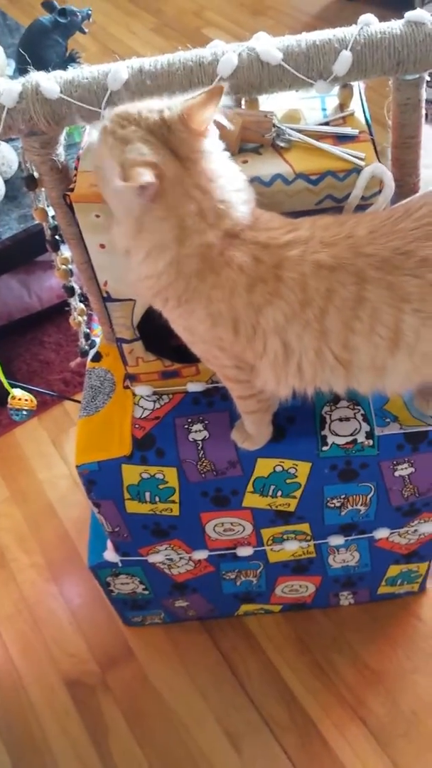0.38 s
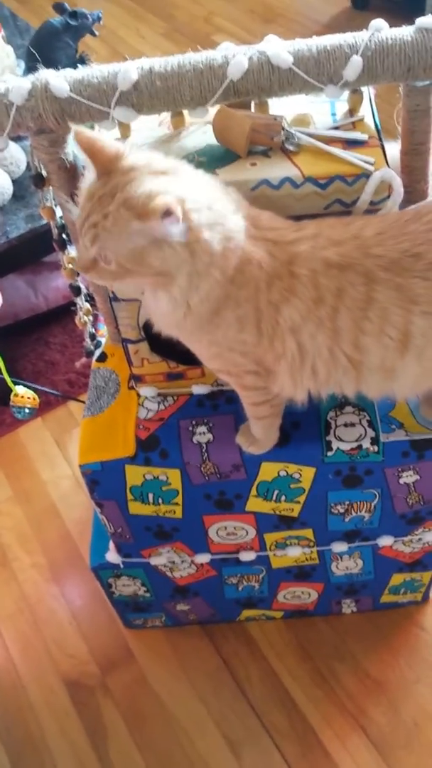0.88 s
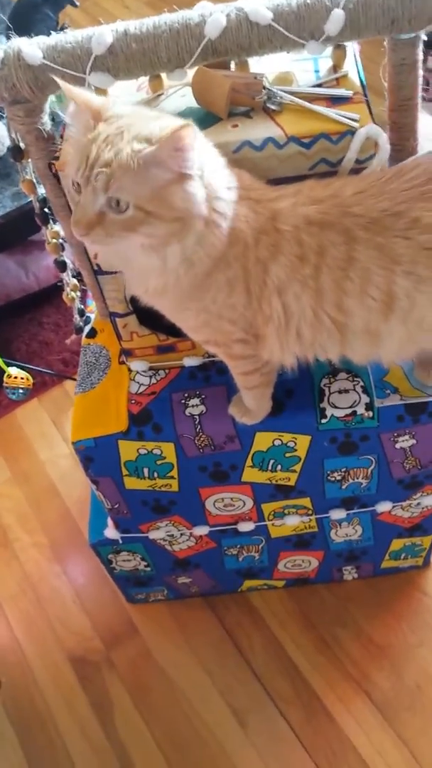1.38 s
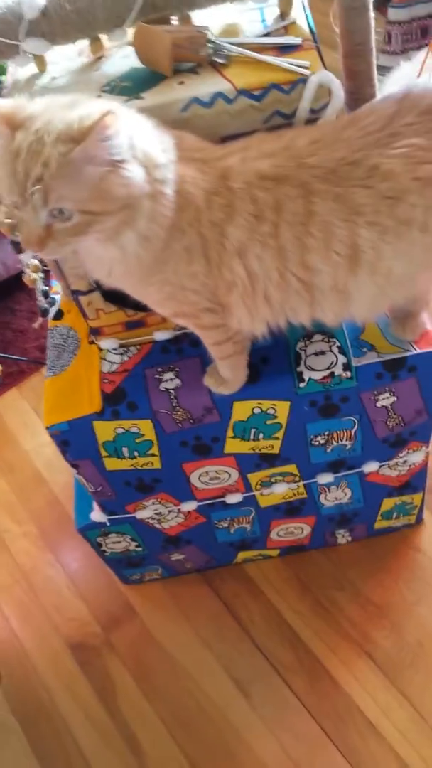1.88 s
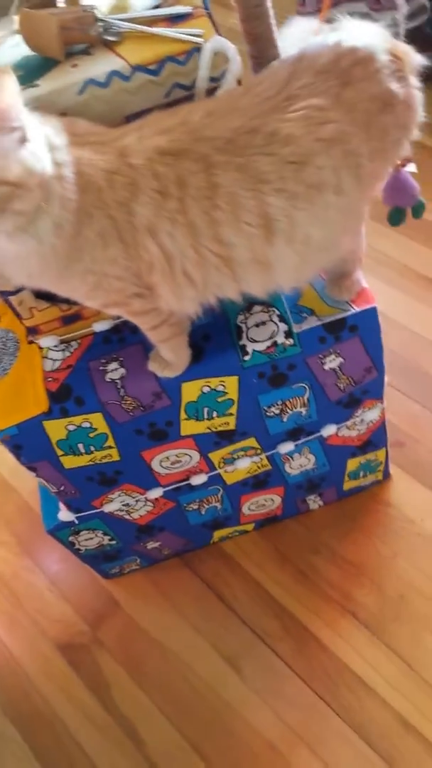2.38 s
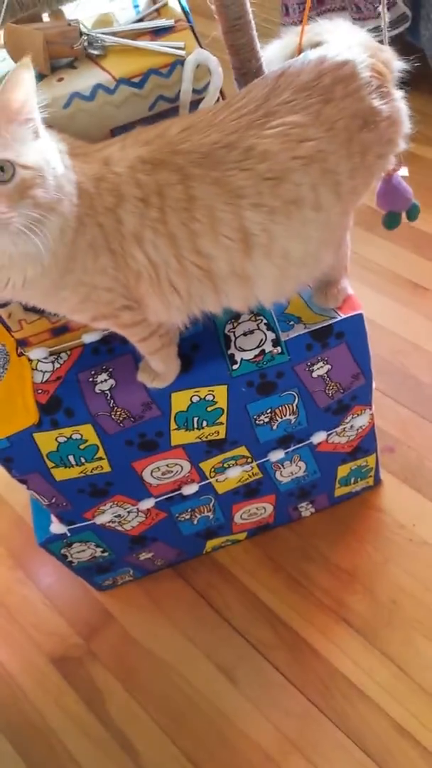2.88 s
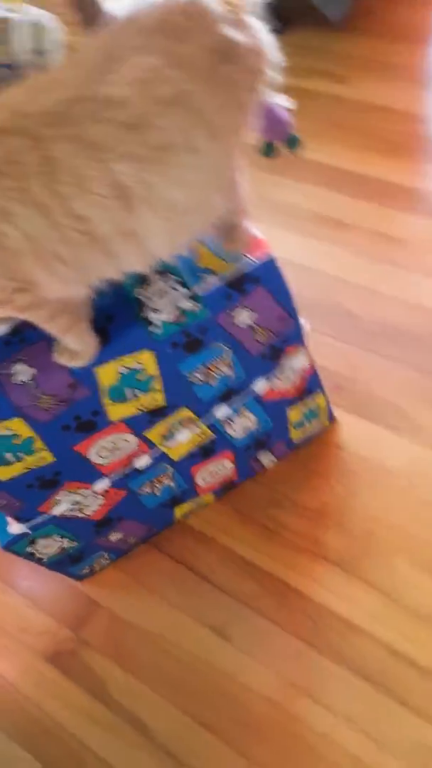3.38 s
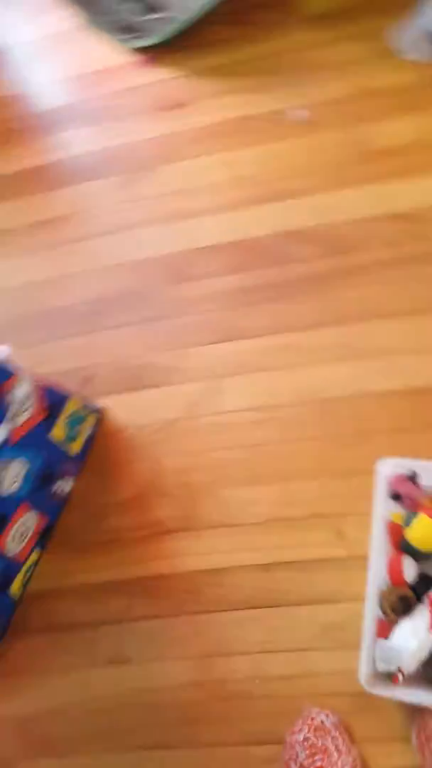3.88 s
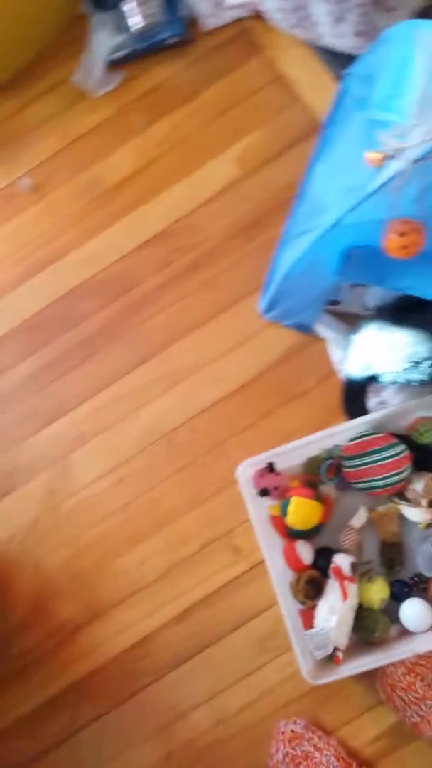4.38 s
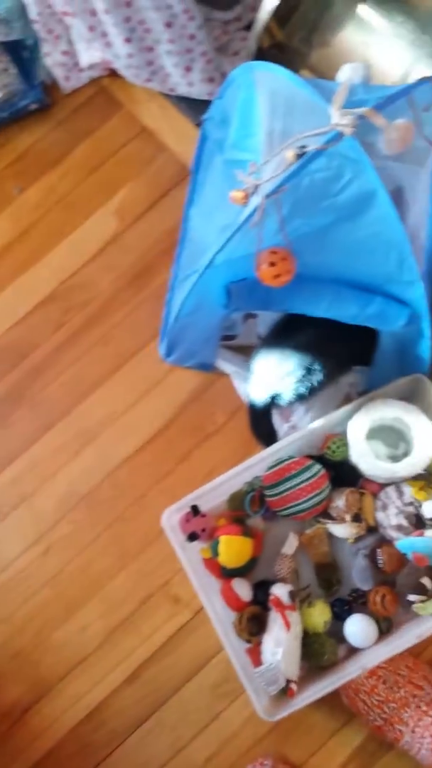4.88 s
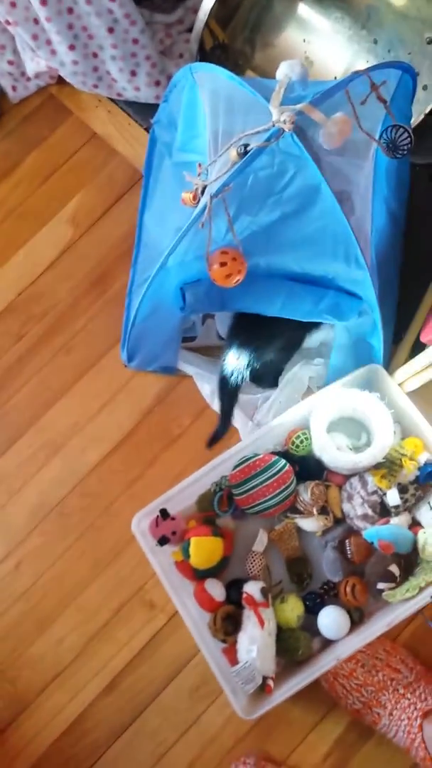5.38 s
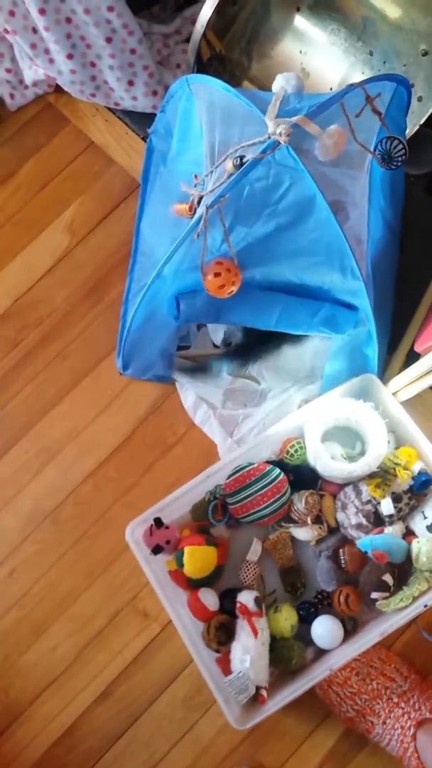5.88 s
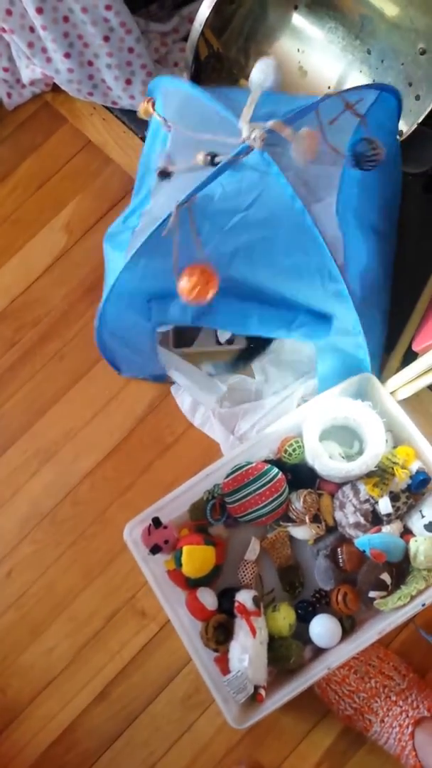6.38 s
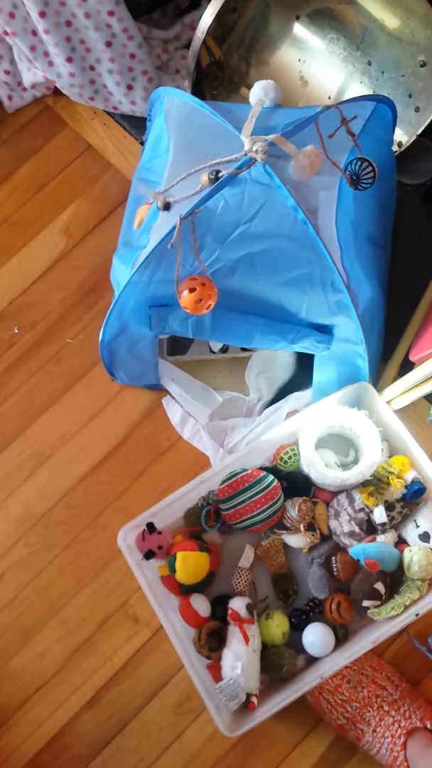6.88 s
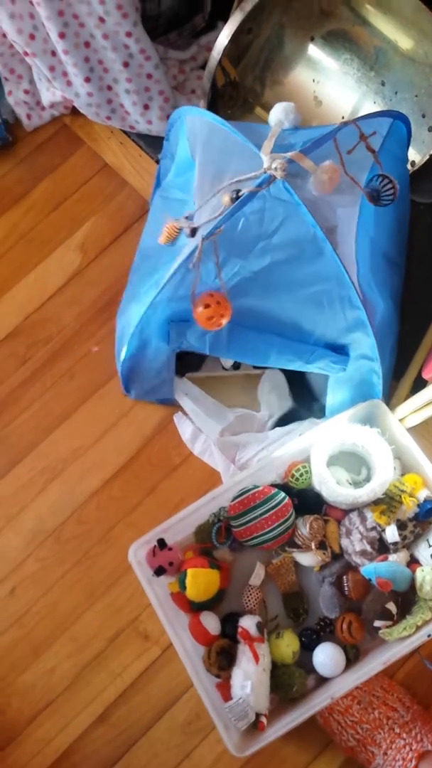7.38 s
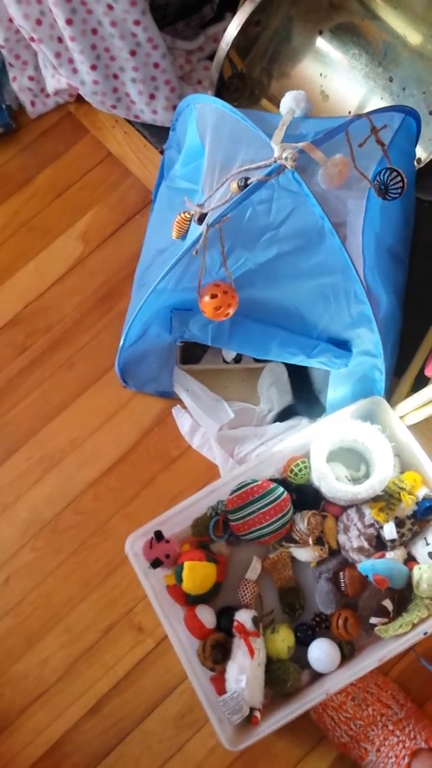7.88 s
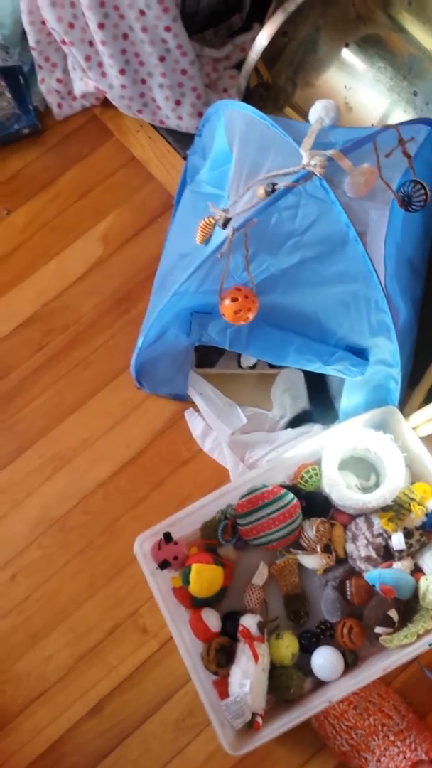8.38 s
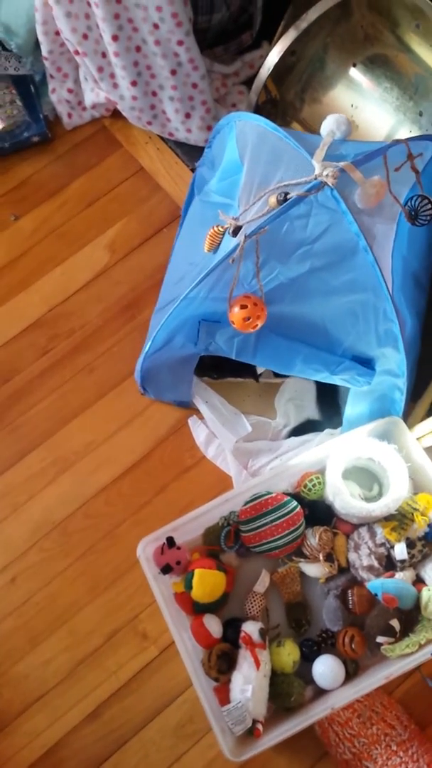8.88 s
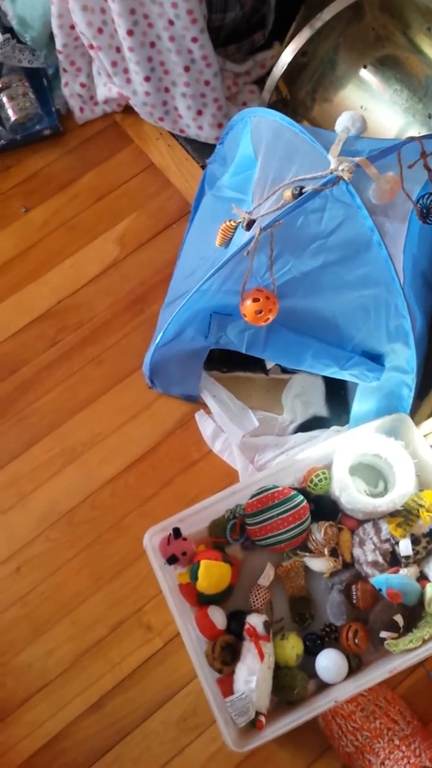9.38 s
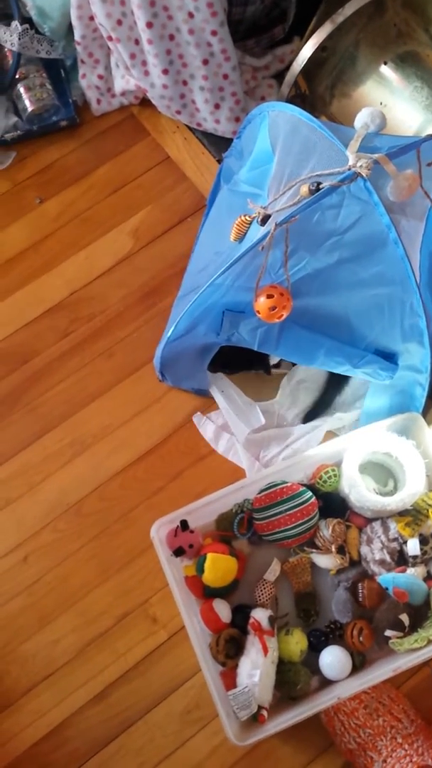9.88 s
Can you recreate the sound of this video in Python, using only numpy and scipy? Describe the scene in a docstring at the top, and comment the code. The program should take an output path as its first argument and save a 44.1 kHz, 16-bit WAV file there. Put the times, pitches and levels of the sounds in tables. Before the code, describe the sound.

A brief jingle of tiny bells opens close by, then a cat on a cloth cube makes crackly rustles and dry creasing ticks. Movement thins out, then a second cat in a nylon tent crinkles the fabric and tissue, snapping it sharply while bells rattle brightly. Another hard crack follows, then near quiet and light ticking. Hand-held phone in a small wooden-floored room with a faint distant appliance drone.

```python
"""Cloth, then nylon and tissue, rustle and snap as two cats move among their toys on a wooden floor.
Rustle is crackling noise, snaps are decaying noise ticks, and paws knock through a low resonance.
A string of tiny bells jingles as decaying modes; an appliance drones far off in narrow noise bands.
A hand-held phone turns from a cloth cube to a nylon tent; its microphone ports ring at 6.3-7.2 kHz."""
import sys
import numpy as np
from scipy import signal
from scipy.fft import rfft, irfft, next_fast_len
from scipy.io import wavfile
from scipy.ndimage import map_coordinates

SR = 44100
rng = np.random.default_rng(int(sys.argv[2]) if len(sys.argv) > 2 else 0)


def transcribe(u):
    """Save the signal u as a 16-bit wav file named by the first command-line argument.

    u: samples, shape (n,) or (channels, n), limited to [-1, 1]; the rate is SR.
    q: integer samples, one column per channel.
    """
    v = np.clip(np.atleast_2d(u).T, -1, 1)
    q = np.round(v * 32767).astype(np.int16)
    wavfile.write(sys.argv[1], SR, q)


def voltage_ratio(level):
    """Linear amplitude factor for a level in decibels (scalar or array-like)."""
    return 10 ** (np.asarray(level, float) / 20)


N = 441000


def unit(x):
    """Scaled to rms 1."""
    return x / np.sqrt(np.mean(x ** 2) + 1e-20)


def along(points, hz):
    """(Hz, value) points interpolated on a log frequency axis."""
    point_hz, value = np.transpose(points)
    return np.interp(np.log(hz + 1), np.log(point_hz + 1), value)


def curves(rows):
    """One value per sample for each column after the time."""
    time_s, *columns = np.transpose(rows)
    return [np.interp(np.arange(N) / SR, time_s, column) for column in columns]


def wobble(knots_per_s):
    """A smooth random curve through normally distributed knots."""
    knots = rng.standard_normal(int(N * knots_per_s / SR) + 4)
    return map_coordinates(knots, [np.arange(N) * knots_per_s / SR])


def filtered(x, response):
    """x times a complex response of frequency."""
    size = next_fast_len(N + 8192)
    spectrum = rfft(x, size) * response(np.fft.rfftfreq(size, 1 / SR))
    return irfft(spectrum, size)[..., :N]


def coloured(x, spectrum):
    """x through a spectrum, at rms 1."""
    return unit(filtered(x, lambda hz: voltage_ratio(along(spectrum, hz))))


def peak(f, hz, width_hz):
    """A causal resonance of gain 1 at its top."""
    return 1j * f * width_hz / (hz * hz - f * f + 1j * f * width_hz + 1e-9)


def crackle(per_s, spread_db, smooth):
    """Sub-millisecond bursts of unequal but bounded size, as fibres slip, over a share of friction noise."""
    sizes = voltage_ratio(spread_db * np.clip(rng.standard_normal(N), -2, 2))
    slips = (rng.random(N) < per_s / SR) * sizes
    decay_s = 0.00041
    bursts = signal.lfilter([1], [1, -np.exp(-1 / (decay_s * SR))], slips) * rng.standard_normal(N)
    smooth = np.clip(smooth, 0, 1)
    return np.sqrt(1 - smooth) * unit(bursts) + np.sqrt(smooth) * rng.standard_normal(N)


def facing_tent():
    """0 while the phone faces the cube, 1 once it faces the tent; a linear turn of 1 s."""
    turn_mid_s, turn_s = 3.62, 1.0
    return np.clip((np.arange(N) / SR - turn_mid_s) / turn_s + .5, 0, 1)


def pair(response):
    """Stereo noise whose left-right likeness and balance depend on frequency, at rms 1."""
    # hz, left-right likeness (clipped to -1..1)
    likeness = [(60, 0.37), (180, 0.96), (550, 0.9), (1650, -0.86), (4970, 1), (15000, -1.1)]
    # hz, left_over_right_db
    balance = [(60, 1.5), (180, -1.5), (550, 7), (1650, 8), (4970, -10), (15000, -5.5)]

    def mid_side(hz):
        angle = np.arccos(np.clip(along(likeness, hz), -1, 1)) / 2
        return response(hz) * [np.cos(angle), np.sin(angle)]

    mid, side = filtered(rng.standard_normal((2, N)), mid_side)
    lean = lambda hz: voltage_ratio(along(balance, hz) * np.array([[.5], [-.5]]))
    return unit(filtered(np.array([mid + side, mid - side]), lean))


def room_tone():
    """Air and microphone hiss, a motor's hum of tones, and a drone that changes as the phone moves."""
    # air spectrum: hz, relative level_db_per_hz
    air_spectrum = [(20, -31), (60, -17), (130, -10.5), (300, -12.5), (450, -21.5), (900, -20.5),
                    (1500, -30), (4000, -36), (6900, -27), (9500, -33), (16000, -42)]
    # drone bands: hz, width_hz of one resonance (applied twice), relative level_db
    drone_bands = [(189.2, 4.2, -68), (233, 108, -65.5), (297.2, 4.3, -68.5), (383.5, 6.8, -75),
                   (552, 4.8, -77), (896, 24, -76.5)]
    # drone level before trim: time_s, level_db
    drone_level = [(0.0, -60), (1.36, -58), (2.9, -64), (3.45, -59.5), (4.6, -63.5), (6.24, -60.5),
                   (6.35, -58.5), (7.49, -55.5), (8.08, -65), (9.44, -65.5), (10.0, -58)]
    # hum tones: hz, level_db before trim
    hum_tones = [(168, -60.5), (321, -72.5), (802, -73)]
    air = voltage_ratio(-60.0) * pair(lambda hz: voltage_ratio(along(air_spectrum, hz)))
    drone = pair(lambda f: sum(voltage_ratio(db) * peak(f, hz, width_hz) ** 2 / np.sqrt(width_hz)
                               for hz, width_hz, db in drone_bands))
    t = np.arange(N) / SR
    hum = np.zeros(N)
    for hz, db in hum_tones:
        tone_gain = voltage_ratio(db + 2.5 + 1.9 * wobble(2.994))
        hum += tone_gain * np.sin(2 * np.pi * hz * t + 0.5 * wobble(4))
    level_db = curves(drone_level)[0]
    hum_gain = voltage_ratio(0.8 * (level_db - level_db.mean()))
    return air + hum_gain * hum + voltage_ratio(level_db + 1.0) * drone


def strikes():
    """Rows (s, dB of each bell): clear strikes that jog the other bells on the string, then loose rattle."""
    # one list for each bell: start_s, level_db before trim
    clear_strikes = [
        [(0.004, -41), (0.055, -34.5), (0.1344, -25), (0.1484, -28), (0.1913, -32.5), (0.2144, -35.5),
         (0.224, -42), (0.2773, -28), (0.329, -33), (1.07, -33), (1.1976, -51)],
        [(0.0022, -33.5), (0.043, -35), (0.1344, -40), (0.2144, -42), (6.4583, -32), (6.4756, -25),
         (6.489, -22), (6.5117, -17), (6.5216, -22), (6.545, -22), (6.5633, -35), (6.5803, -27)],
        [(0.1344, -31.5), (0.1484, -43), (0.2144, -32.5), (0.2773, -32), (0.2937, -27.5)],
        [(0.015, -50), (0.043, -42), (0.055, -46), (0.064, -39), (0.12, -43), (0.135, -38), (0.176, -37),
         (0.2144, -34), (0.259, -23), (0.2773, -24), (0.3175, -26), (0.3426, -33), (0.3516, -28.5),
         (1.1127, -47), (1.1272, -37), (1.1405, -30), (1.1643, -31), (1.1976, -33), (1.2903, -41),
         (1.3037, -30), (1.3279, -41), (6.316, -40), (6.327, -36), (6.336, -37), (6.4213, -30), (6.4381, -26),
         (6.4467, -23), (6.489, -28), (6.524, -24), (6.5635, -33), (6.6059, -34), (6.6263, -32), (6.6574, -25),
         (6.707, -41.5), (6.7266, -31), (6.7356, -29), (6.7445, -32), (6.8074, -39)],
        [(0.055, -48), (0.1344, -32), (0.1484, -42), (0.1913, -35), (0.2144, -30), (0.224, -37),
         (0.2773, -15.5), (0.2937, -37), (0.329, -38), (1.07, -37), (6.6711, -25), (6.6884, -23), (6.707, -22),
         (6.834, -31), (6.8555, -30)],
        [(6.4213, -23), (6.4381, -29), (6.4583, -21), (6.4756, -29), (6.489, -21.5), (6.5117, -26),
         (6.5633, -37), (6.6278, -38), (6.668, -24), (6.676, -30), (6.6884, -23), (6.707, -21), (6.8079, -36),
         (6.834, -27), (6.8555, -21.5)],
        [(6.4213, -28), (6.4381, -30), (6.5117, -29), (6.6884, -19), (6.707, -19.5), (6.8555, -30)],
    ]
    # swings of the string: start_s, end_s, then level_db of each bell before trim
    swings = [(0, 0.402, -44, -54, -47, -42, -62, -72.5, -61),
              (1.11, 1.352, -49, -67, -65.5, -48, -54, -67, -65),
              (6.441, 6.598, -54, -32, -60, -38, -52, -43, -38),
              (6.599, 6.877, -53, -54, -64, -42, -39, -42, -40)]
    jog_db, jog_spread_db = -24, 2.5
    rattle_spread_db, contacts_per_swing = 4.5, 20
    count = len(clear_strikes)
    rows, others = [], 1 - np.eye(count)
    for struck, hits in enumerate(clear_strikes):
        for s, db in hits:
            jog = jog_db + jog_spread_db * rng.standard_normal(count)
            rows.append((s, *(db + others[struck] * jog)))
    for start_s, end_s, *levels in swings:
        for s in rng.uniform(start_s, end_s, contacts_per_swing):
            rows.append((s, *(levels + rattle_spread_db * rng.standard_normal(count))))
    return rows


def bells():
    """Each strike rings every mode at a new strength, unlike at each port; the loose pea then rebounds."""
    # modes of each bell: hz, relative level_db, t60_s
    bell_modes = [
        [(5310, -9, 0.11), (5760, -14, 0.13), (5830, -12, 0.08), (5830, -9.5, 0.19)],
        [(6902, 0, 0.1), (6580, -16, .06), (5260, -13, 0.087)],
        [(7000, -19, .1), (7200, -9.5, .12), (7630, -21, .12), (7700, -15, 0.31), (7800, -16, 0.18),
         (8000, -14, .04), (9150, -8, 0.063), (9440, -16, 0.06)],
        [(10760, -12.5, 0.13), (10920, -8, 0.053), (11020, -7, 0.025), (11370, -14, .015), (12200, -20, 0.02)],
        [(6100, -25, .03), (6266, -9, 0.08), (6350, -5.5, 0.081)],
        [(5200, -11, 0.046), (5740, -12, 0.073), (5820, -8, 0.071), (5930, -8, 0.054)],
        [(7100, -16, .06), (7267, -17, .05), (7564, -14, 0.069), (7650, -5.5, 0.053), (8320, -11, .04),
         (9460, -9, 0.043)],
    ]
    # extra strength of each bell's first cycles (ratio)
    clanks = [1.9, .1, 1.3, 1.1, 2.2, 1.44, 1.9]
    # rise time constant of each bell: onset_s
    onsets = [.0003, 0.0014, 0.00025, 0.00052, 0.00024, 0.00025, 0.00026]
    trims_db = [-10.5, -11.0, -8.5, -3.0, -13.5, -10.5, -10.5]
    tick_db, tick_t60_s = -20, 0.0027  # contact noise re the loudest bell of the strike
    out, t = np.zeros((2, N + SR)), np.arange(SR // 5) / SR
    for s, *levels in strikes():
        at = round(s * SR)
        tick_gain = voltage_ratio(max(levels) + tick_db - 60 * t[:300] / tick_t60_s)
        out[:, at:][:, :300] += tick_gain * rng.standard_normal(300)
        for modes, db, trim_db, clank, onset_s in zip(bell_modes, levels, trims_db, clanks, onsets):
            hz, mode_db, t60_s = np.transpose(modes)[:, :, None]
            both, left, right, detune = rng.standard_normal((4, len(modes), 1))
            luck_db = 1.4 * both + 0.68 * np.array([left, right])
            size = voltage_ratio(db + trim_db + mode_db + luck_db - 60 * t / t60_s)
            phase = 2 * np.pi * hz * (1 + 0.0014 * detune) * t + 0.71 * np.array([right, left])
            ring = np.sum(size * np.sin(phase), axis=1)
            ring *= 1 - np.exp(-t / max(onset_s, 1 / SR))
            ring *= 1 + clank * np.exp(-t / 0.0036)  # the first cycles die fast
            out[:, at:][:, :len(t)] += ring
            for wait, luck in rng.random((3, 2)):
                rebound = round((s + .003 + .045 * wait) * SR)
                out[:, rebound:][:, :len(t)] += voltage_ratio(-22.0 - 7.52 * wait - 7.4 * luck) * ring
    return out[:, :N]


def snaps():
    """Creases give a dry tick, hard ones add a white crack and a hiss; paws knock softly through the frame."""
    # creases and paws: start_s, level_db before trims, knock_db re the snap before trims
    events = [(0.4788, -36, -15.5), (0.665, -32, -32), (0.7485, -25, -28), (0.86, -24, -31),
              (1.0302, -28, -21), (1.2004, -24, -37), (1.3892, -21, -24), (1.5456, -34, -35.5),
              (1.905, -23.5, -31), (2.0332, -23.5, -20), (2.342, -27.5, -24), (2.3841, -28.5, -23),
              (2.8423, -37.5, -33), (3.2656, -36, -26), (3.3123, -32, -14), (3.41, -46, -37),
              (4.3262, -35.5, -26), (4.3866, -30.5, -23), (5.9332, -25, -15), (5.969, -21, -22),
              (6.0006, -41.5, -22.5), (6.23, -29.5, -8), (6.2449, -22, -17), (6.3028, -9.5, -23.5),
              (6.3049, -12, -30), (6.3061, -18, -30), (7.265, -22, -40.5), (7.3373, -10, -22),
              (7.339, -15, -35), (7.3454, -17, -25), (7.507, -23, -43), (7.7528, -31, -26),
              (7.8, -24.5, -33), (7.882, -23, -47), (8.2956, -36, -24.5), (8.678, -39, -10),
              (9.307, -41.5, -26), (9.325, -50, -25.5), (9.41, -43, -21), (9.506, -29.5, -42.5),
              (9.5487, -39, -28), (9.6135, -32, -26.5), (9.6274, -35, -22), (9.7014, -29, -27),
              (9.7256, -35.5, -27), (9.7593, -30, -28), (9.815, -31, -27), (9.84, -26, -24),
              (9.866, -32, -31), (9.899, -28, -30), (9.9235, -30, -34)]
    tick, crack, knock = np.zeros((3, N + SR))
    t = np.arange(SR // 10) / SR
    for s, db, knock_db in events:
        snap_noise, knock_noise = rng.standard_normal((2, len(t)))
        snap_noise = snap_noise / np.std(snap_noise[:30])  # the first 0.7 ms sets the level
        at, hard = round(s * SR), np.clip((db + 25) / 18, 0, 1)
        decay = voltage_ratio(-60 * t / 0.0069) + 0.17 * hard * voltage_ratio(-60 * t / 0.067)  # tick, then hiss
        tick[at:][:len(t)] += voltage_ratio(db - 1.5) * snap_noise * decay
        crack[at:][:len(t)] += voltage_ratio(db - 8) * hard * voltage_ratio(-60 * t / 0.00032)
        knock[at:][:len(t)] += voltage_ratio(db + knock_db + 11.0) * knock_noise * voltage_ratio(-60 * t / 0.036)
    dry_tick = filtered(tick[:N], lambda f: peak(f, 5430.0, 4550) ** 2)
    white_crack = filtered(crack[:N], lambda f: peak(f, 9500, 15000))
    soft_knock = filtered(knock[:N], lambda f: peak(f, 320, 850) + 1.0 * peak(f, 320.0, 160))
    return dry_tick + white_crack + soft_knock


def effort_db():
    """Drive of fabric and frame: every swish rises and falls steadily in dB over the faint stirring."""
    # faint rustle that never stops: time_s, level_db before trims
    stirring = [(0, -51), (0.45, -55), (1.25, -46), (1.65, -51), (2.2, -67), (2.45, -62), (2.9, -61),
                (3.55, -54), (4.1, -64), (4.55, -65.5), (5.4, -61), (5.7, -66), (6.2, -55), (6.6, -69),
                (7.05, -49), (7.57, -55.5), (8, -70), (8.25, -69), (8.88, -70), (9.48, -75.5), (9.6, -57.5),
                (10, -54)]
    # moves of a cat against the fabric: peak_s, peak_db before trims, rise_s per 20 dB, fall_s per 20 dB,
    # frame_db over the fabric; rise and fall shorter than sharpest_s are raised to it
    swishes = [(0.146, -47, -0.5, 1, -12), (0.521, -35.5, 0.07, 0.17, -13),
               (0.715, -26.5, 0.1, 0.12, -16.5), (0.818, -23.5, 0.0739, 0.0267, -11.5),
               (0.88, -34, 0.06, 0.08, -11), (1.048, -30.5, 0.1, 0.23, -12),
               (1.394, -34.5, -0.02, 0.5, -14), (1.476, -27, 0.07, -0.02, -28),
               (1.6, -47.5, -0.26, 0.21, -2.5), (1.737, -33.5, -0.06, 0.09, -9),
               (1.909, -34, 0.15, 0.36, -11), (2.086, -28, 0.14, 0.0647, -14),
               (2.39, -47.5, 0.2, -0.08, -11), (2.656, -36, 0.18, 0.0947, -11.5),
               (3.07, -48.5, 0.04, 0.08, -8.5), (3.172, -50, 0, 0.23, -5), (3.344, -42, 0.15, 0.35, -8.5),
               (3.879, -46, 0.48, 0.28, -8.5), (4.393, -52.5, 0.1, 0.04, -7.5),
               (4.925, -46.5, 0.24, 0.12, -3.5), (5.291, -53.5, 0.96, .06, -5.5),
               (5.434, -42.5, 0.06, 0.03, -7), (5.5, -54, 0.1, 0.5, -6), (5.575, -47.5, 0.13, 0.07, -7),
               (5.785, -36, 0.08, 0.23, -9), (5.941, -34, 0.0268, 0.11, -6.5),
               (5.964, -26.5, 0.0453, 0.06, -9.5), (6.02, -43, 0.01, -0.2, -8),
               (6.123, -36, 0.06, 0.11, -8), (6.246, -30.5, 0.03, 0.05, -10.5),
               (6.31, -30, 0.0129, 0.1, -11), (6.36, -26.5, 0.1135, 0.34, -10),
               (6.69, -36, -0.4, 0.31, -12.5), (6.85, -35.5, 0.15, 0.16, -8.5), (7.0, -46, 0, 0.58, -9.5),
               (7.3, -41.5, 1, 0.1, -11), (7.341, -40.5, 0.2, 0.2, -21),
               (7.434, -34.5, 0.26, 0.1344, -10.5), (7.64, -43, 0.1, 0.21, -9), (7.77, -42, 0.07, 0.08, -6),
               (8.104, -55.5, 0.3, 0.04, -3.5), (8.53, -51.5, 0.1, 0.42, -7), (8.64, -50, 0.33, 0.08, -5),
               (9.317, -64, 0.1, 0.6, -5), (9.512, -52.5, -0.03, 0.4, -10.5), (9.63, -51, 0, 0.2, -6.5),
               (9.76, -48.5, 0.17, 1.5, -10), (9.87, -44, 0.22, 0.14, -9.5)]
    fidget_db, fidget_per_s, sharpest_s = 2.9, 14, .01
    frame_base_db, frame_growth = -56.5, 0.75  # frame at -49.5 dB of stirring; dB gained per dB of rustle
    t = np.arange(N) / SR
    stir_db = curves(stirring)[0] + fidget_db * wobble(fidget_per_s)
    fabric_power = voltage_ratio(2 * stir_db)
    frame_power = voltage_ratio(2 * (frame_base_db + frame_growth * (stir_db + 49.5)))
    for s, db, rise_s, fall_s, frame_db in swishes:
        rise_s, fall_s = max(rise_s, sharpest_s), max(fall_s, sharpest_s)
        near = slice(max(round((s - 2 * rise_s) * SR), 0), round((s + 2 * fall_s) * SR))
        under_db = 20 * np.maximum((s - t[near]) / rise_s, (t[near] - s) / fall_s)
        fabric_power[near] += voltage_ratio(2 * (db - under_db))
        frame_shape = voltage_ratio(-2 * frame_growth * under_db) - voltage_ratio(-2 * frame_growth * 41)
        frame_power[near] += voltage_ratio(2 * (db + frame_db)) * np.maximum(frame_shape, 0)
    return 10 * np.log10(fabric_power), 10 * np.log10(frame_power)


def rustle():
    """Cloth, then nylon and tissue, crackle in clumps; the hollow frame under them rumbles along."""
    # spectra: hz, relative level_db_per_hz
    cloth_spectrum = [(300, -28.5), (1200, -12), (2300, -5), (4000, 2), (6000, 1.5), (9000, -0.5),
                      (12000, -8.5), (16000, -14)]
    nylon_spectrum = [(300, -50), (1200, -7.5), (2500, -1), (4800, 4.5), (7000, 2), (9500, -0.5),
                      (11500, -16.5), (13500, -31), (16000, -26)]
    frame_spectrum = [(60, -8.5), (150, -2.5), (500, -2), (900, -0.5), (1600, -5.5), (3000, -10.5)]
    (rustle_db, frame_db), tent = effort_db(), facing_tent()
    cloth = coloured(crackle(per_s=800, spread_db=4.5, smooth=0.23), cloth_spectrum)
    nylon = coloured(crackle(per_s=900, spread_db=4.0, smooth=0.32), nylon_spectrum)
    frame = coloured(crackle(per_s=250, spread_db=5.0, smooth=0.56), frame_spectrum)
    clumps_db = 0.86 * wobble(35) + 1.73 * wobble(200)
    fabric = voltage_ratio(-7.5) * (1 - tent) * cloth + voltage_ratio(-5.5) * tent * nylon
    sheet = voltage_ratio(rustle_db + clumps_db) * fabric
    dull = filtered(sheet, lambda hz: 1 / (1 + (hz / 11500) ** 6))
    brisk = np.clip((rustle_db + 65) / 28, 0, 1)  # gentle moves lack the highest treble
    return dull + brisk * (sheet - dull) + voltage_ratio(frame_db + 0.16 * clumps_db) * frame


def direct(x):
    """The straight path: one port hears it sooner, and the phone's body shades the treble of the other."""
    # direction: left_lag_s, left_over_right_db, further_db at 10 kHz (linear in Hz)
    cube_path = (-0.00027, 5.5, 0.84)
    tent_path = (.00008, 2.3, -3)
    side, tent = np.array([[.5], [-.5]]), facing_tent()

    def path(lag_s, db, treble_db):
        return lambda hz: (voltage_ratio(side * (db + treble_db * hz / 10000))
                           * np.exp(-2j * np.pi * hz * side * lag_s))

    return filtered(x * (1 - tent), path(*cube_path)) + filtered(x * tent, path(*tent_path))


def room(x):
    """Each frequency dies at its own speed; every 1/25 s of sound meets new echoes."""
    # decay: hz, t60_s
    decay = [(200, 0.21), (2000, 0.22), (7000, 0.14), (14000, 0.048)]
    out, hop, size = np.zeros((2, N + SR)), SR // 25, SR // 5
    noise = rng.standard_normal((N // hop, 2, size))
    hz, t, z = signal.stft(noise, SR, nperseg=128)
    alike = np.sinc(np.minimum(2 * hz * 0.19 / 343, 1))[:, None]  # long waves reach both ports alike
    z[:, 1] = alike * z[:, 0] + np.sqrt(1 - alike ** 2) * z[:, 1]
    fade = voltage_ratio(-60 * t / along(decay, hz)[:, None])
    tails = signal.istft(z * fade, SR, nperseg=128)[1]
    tails /= np.sqrt(np.mean(np.sum(tails ** 2, axis=2)))
    pieces = x[:len(tails) * hop].reshape(-1, 1, hop)
    wet = signal.fftconvolve(pieces, tails, axes=2)
    for k, piece in enumerate(wet):
        out[:, k * hop + 70:][:, :piece.shape[1]] += piece  # 70 samples after the direct sound
    return out[:, :N]


def ports(x):
    """The air in each microphone port resonates, the left one more sharply for sound from the cube's side."""
    # left port, right port: hz, width_hz, ring_db added to the plain sound
    cube_ports = [(6306, 480, 14.86), (6700, 1650, 5.8)]
    tent_ports = [(6290, 1050, 10.9), (7170, 1020, 8.5)]
    tent = facing_tent()

    def ring(both):
        return lambda f: np.array([1 + voltage_ratio(db) * peak(f, hz, width_hz) for hz, width_hz, db in both])

    return filtered(x * (1 - tent), ring(cube_ports)) + filtered(x * tent, ring(tent_ports))


def scene():
    """Sharp sounds arrive mostly direct, the broad rustle mostly by way of floor and walls."""
    jingle, cracks, soft = bells(), snaps(), rustle()
    near = direct(jingle + cracks + voltage_ratio(-5.5) * soft)
    echoes = room(voltage_ratio(-5.5) * jingle[0] + voltage_ratio(-10.0) * cracks + voltage_ratio(-4.0) * soft)
    return ports(near + echoes) + room_tone()


def band_limit(x):
    """A steep low-pass at the top of the band."""
    return signal.sosfilt(signal.butter(12, 16660, fs=SR, output="sos"), x)


def record(dry):
    """The phone's band limit: 34 dB down from 15.5 kHz up."""
    limited = filtered(dry, lambda hz: np.where(hz < 15500, 1, voltage_ratio(-34.0)))
    return band_limit(limited)


dry = scene()
out = record(dry)
transcribe(out)
```